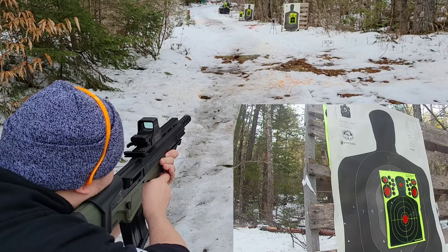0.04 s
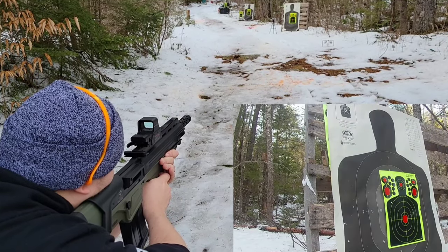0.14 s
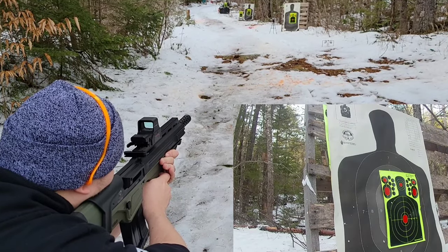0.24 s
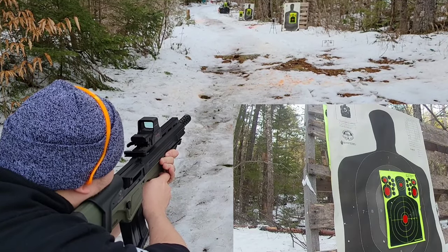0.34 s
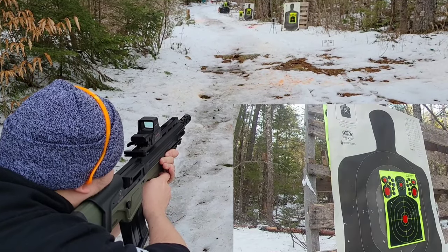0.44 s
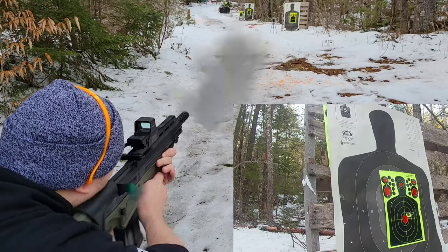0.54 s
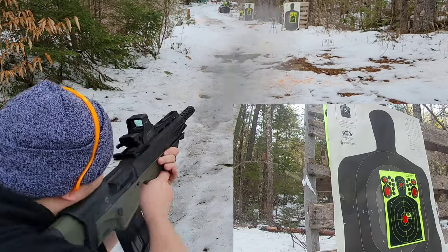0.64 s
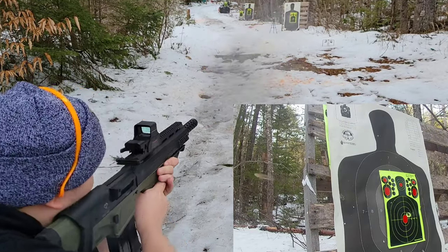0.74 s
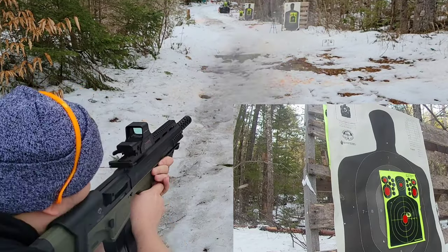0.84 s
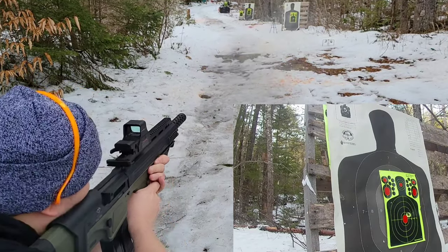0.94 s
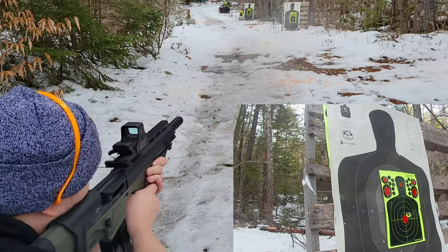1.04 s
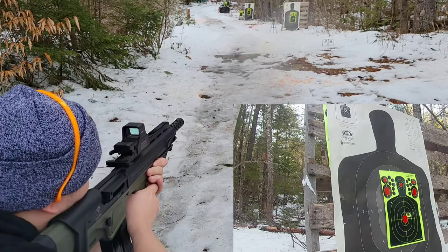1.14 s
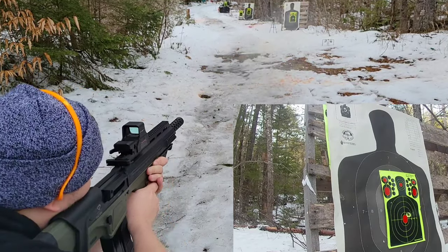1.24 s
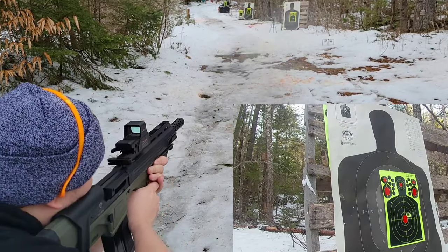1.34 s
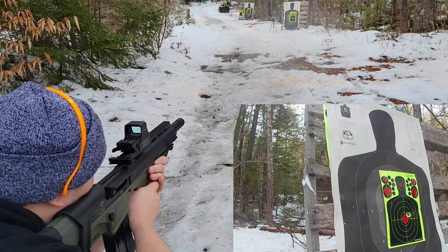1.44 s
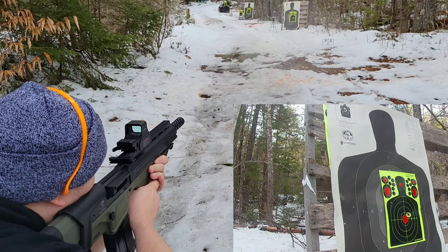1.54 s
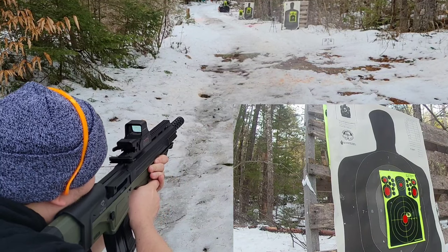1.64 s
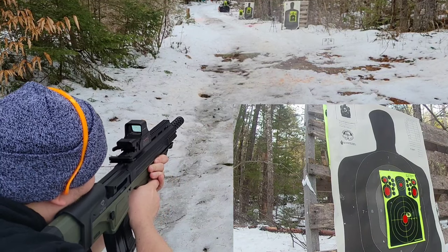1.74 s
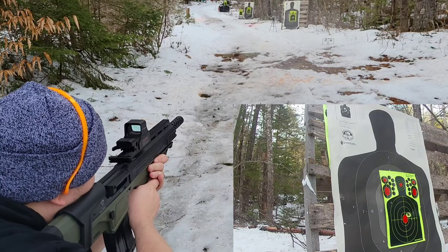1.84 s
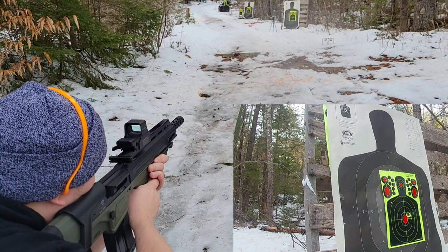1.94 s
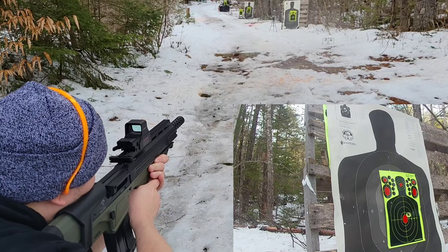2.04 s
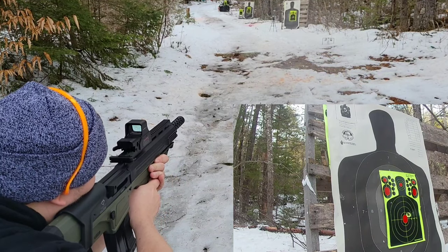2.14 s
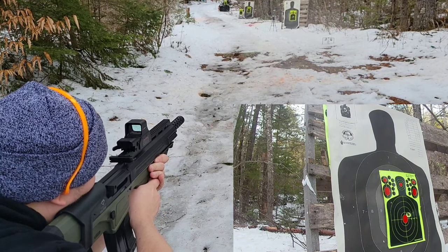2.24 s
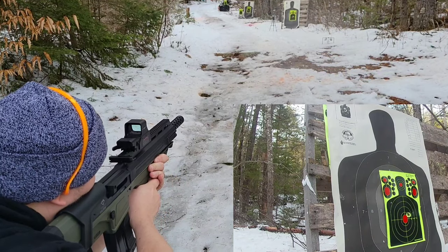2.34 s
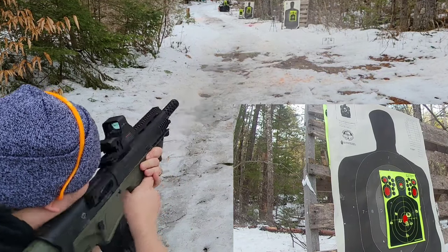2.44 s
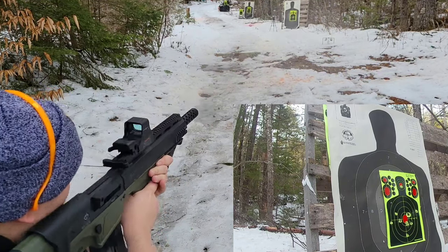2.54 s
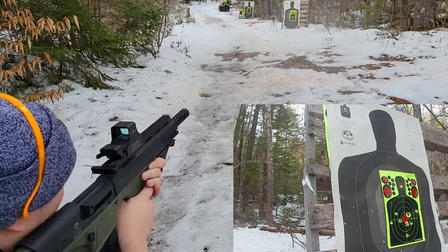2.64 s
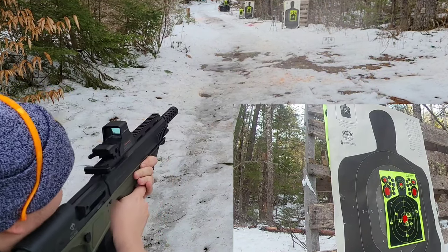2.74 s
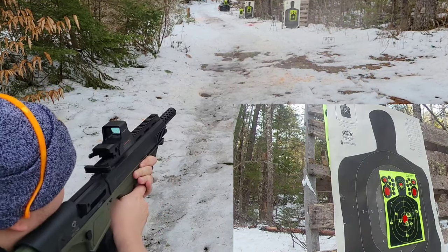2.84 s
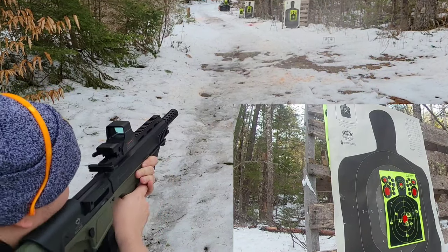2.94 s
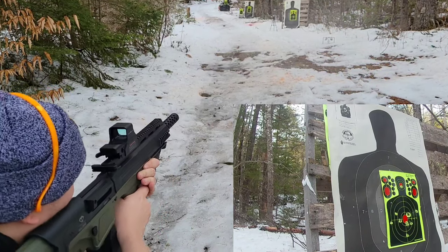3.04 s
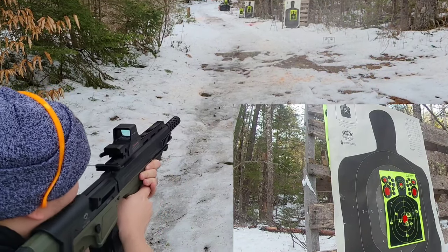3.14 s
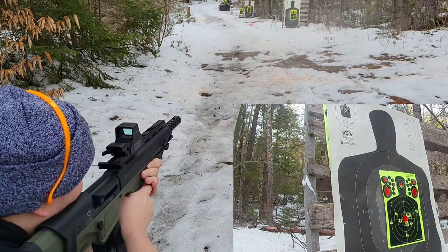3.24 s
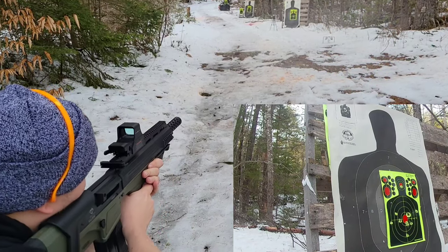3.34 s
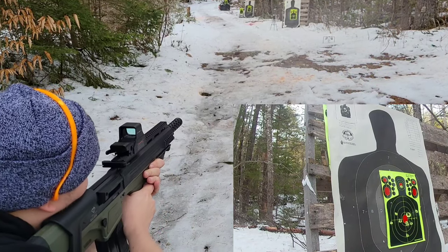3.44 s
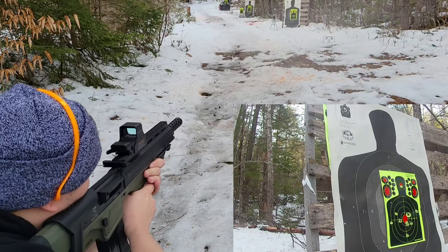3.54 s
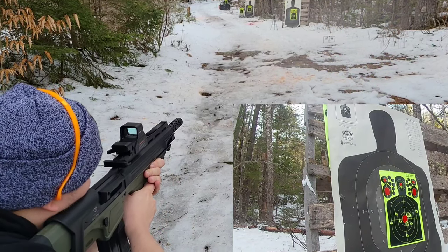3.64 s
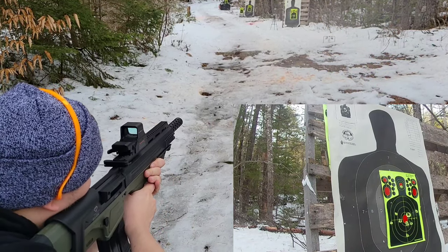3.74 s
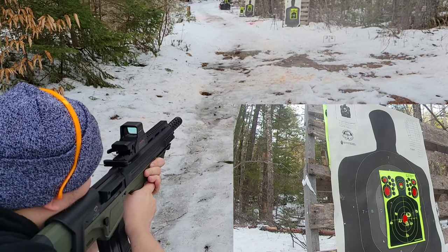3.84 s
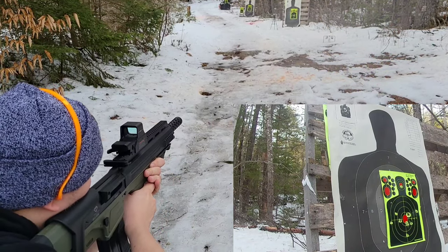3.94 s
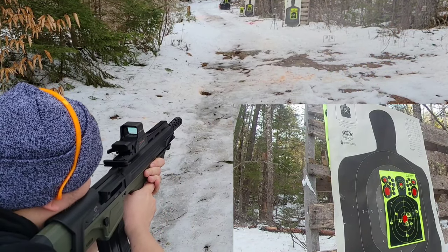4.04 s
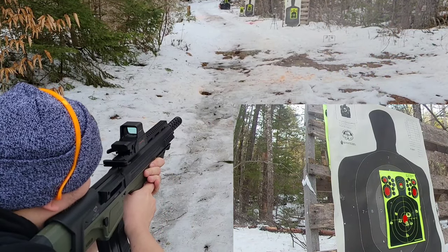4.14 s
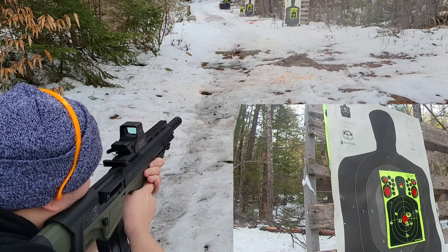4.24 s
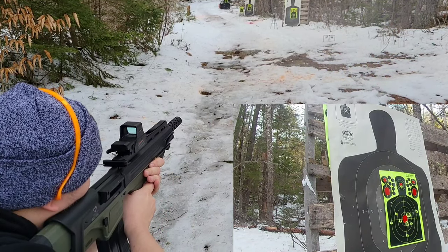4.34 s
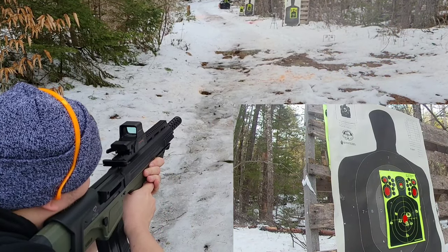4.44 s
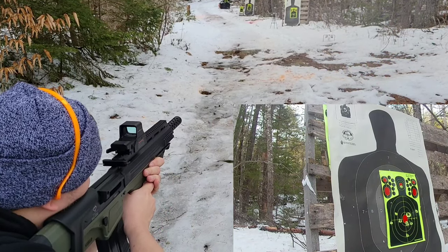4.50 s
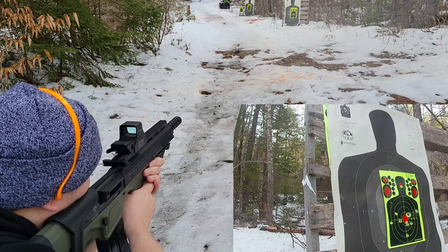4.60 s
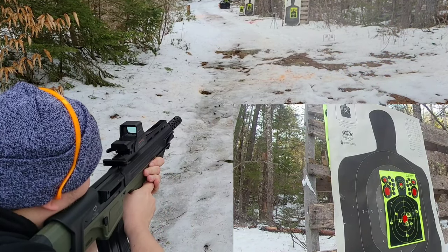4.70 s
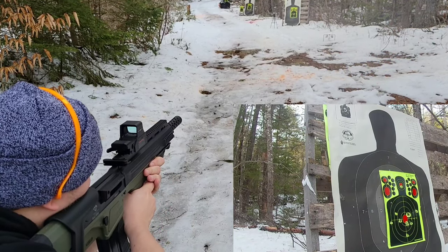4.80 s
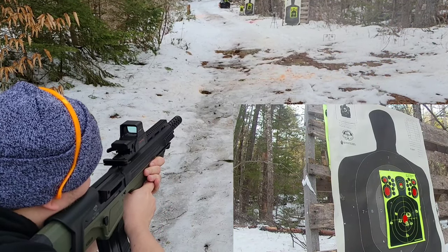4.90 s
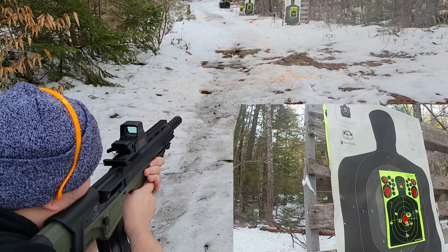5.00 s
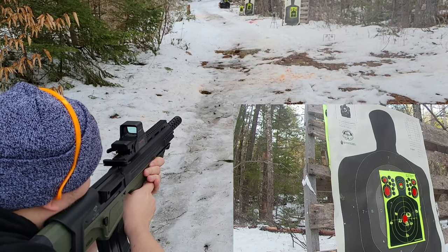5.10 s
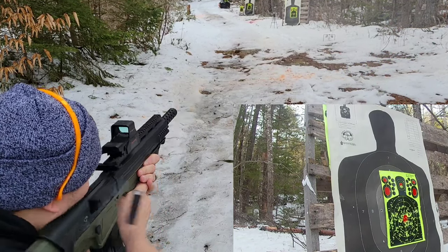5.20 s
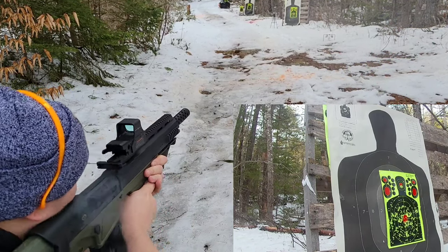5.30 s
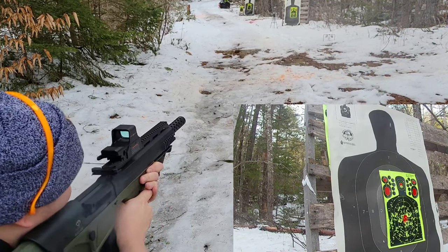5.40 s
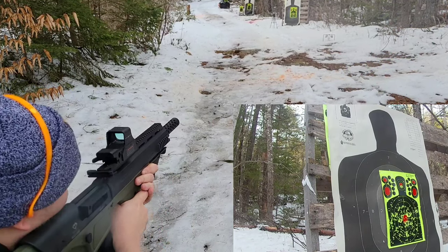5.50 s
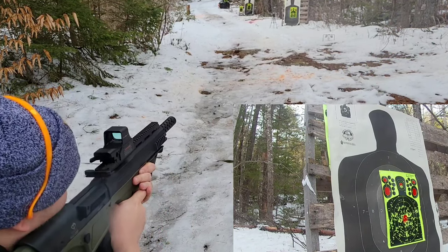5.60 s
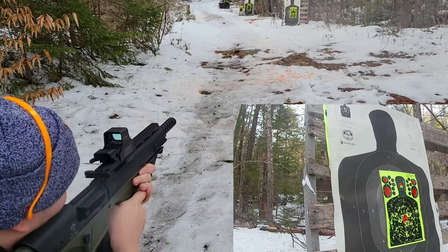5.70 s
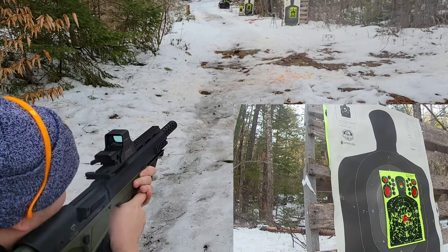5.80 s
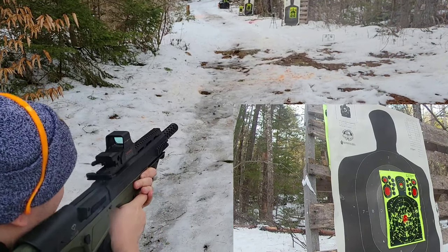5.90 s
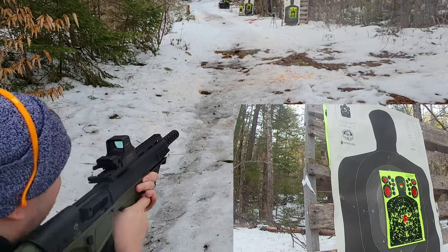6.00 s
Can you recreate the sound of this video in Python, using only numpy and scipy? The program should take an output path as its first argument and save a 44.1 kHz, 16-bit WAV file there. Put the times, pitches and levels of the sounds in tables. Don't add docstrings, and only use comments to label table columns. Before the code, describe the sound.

Very quiet winter air, with a soft distant hush in the trees. At 0.59 s, after a brief streaky hiss, a shotgun blast hits close by, clipping the small stereo microphone into a harsh, ringing crack with a wobbling low thump. Hard slaps bounce off trunks until about 0.75 s, with a bolt clack near 0.67 and a faint shell tick at 0.88. A bright near roar dies quickly, while a duller forest roar and low ground rumble roll away. A small click comes at 1.87. The second, slightly weaker blast strikes at 2.44, followed by a short clack, slap, shell tick at 2.75 and long fading tail; barely audible grip clicks come around 3.45-3.65. A metallic trigger click at 5.12 precedes the third, weakest blast at 5.24. Its echoes decay as shells bounce lightly on snow crust from 5.6 to 5.96, loudest at 5.71.

```python
import sys
import numpy as np
from scipy import signal
from scipy.fft import rfft, irfft
from scipy.io import wavfile
from scipy.ndimage import uniform_filter1d

SR = 44100
rng = np.random.default_rng(int(sys.argv[2]) if len(sys.argv) > 2 else 0)


def generate_wav(sig):
    pcm = np.round(np.clip(np.atleast_2d(sig).T, -1, 1) * 32767).astype(np.int16)
    wavfile.write(sys.argv[1], SR, pcm)


def to_linear_factor(level_db):
    exponent = np.asarray(level_db, float) / 20
    return 10 ** exponent


N = 267246

# frequency in Hz, level in dB per Hz.
AIR_COLOUR = [(15, -40.5), (30, -14.5), (70, 1), (140, -14), (300, -13.5), (600, -14.5), (1200, -24.5),
              (2100, -28), (3000, -33.5), (7000, -41.5), (9000, -44), (13000, -42), (16000, -48.5)]
AIR_DB = -64
# frequency in Hz, left-right likeness from -1 to 1.
PORT_LIKENESS = [(40, .6), (70, .45), (125, 1), (250, 0.83), (500, -.1), (1000, -0.13), (4000, -.05),
                 (12000, 0.17)]

# start in seconds, strength in dB, second ring mode in Hz, ring held in seconds,
# leading hiss in seconds.
SHOTS = [
    (.5878, 0, 2290, .0125, .038),
    (2.4370, -3.5, 2015, .0102, .044),
    (5.2385, -4.5, 2200, .006, .043),
]
# frequency in Hz, level in dB per Hz.
HISS_COLOUR = [(35, -12), (70, -1.5), (300, -8.5), (900, -8.5), (1550, -1), (2300, -9), (3300, -3.5),
               (4500, -13), (7500, -11.5), (9500, -22.5), (13000, -11), (16000, -21.5)]
HISS_DB, HISS_RISE = -12.5, 2.9
RING_HZ, THUMP_HZ = 1485, 196

# level at full strength in dB, dB it moves per dB of strength.
RING_LEVEL = (2.8, .3)
THUMP_LEVEL = (-11, -1.5)
CAPSULE_LEVEL = (3, 0.87)
NEAR_LEVEL = (-2.5, 1.01)
MIDDLE_LEVEL = (-21, 2.13)
FAR_LEVEL = (-15, 0.71)

# frequency in Hz, level in dB per Hz.
NEAR_COLOUR = [(18, -39.5), (30, -15.5), (165, -7.5), (461, -13.5), (937, -13), (1500, -11), (2410, -19.5),
               (3580, -16.5), (8740, -28.5), (13000, -28), (16000, -32.5)]
MIDDLE_COLOUR = [(300, -28.5), (1000, -8.5), (2000, 1.5), (3500, -2.5), (6000, -7.5), (8000, -12.5),
                 (10000, -27), (13000, -26.5), (16000, -33.5)]
FAR_COLOUR = [(18, -39.5), (30, -15), (76, -10.5), (138, -16.5), (223, -5.5), (330, -5.5), (480, -5.5),
              (724, -2), (1100, -5), (1500, -12.5), (2050, -12.5), (3000, -21), (6000, -23.5), (9000, -41),
              (16000, -53)]
# frequency in Hz, time to fall 60 dB in seconds.
NEAR_T60 = [(50, .9), (150, 0.7), (500, 0.4), (1500, .6), (4000, 0.38), (8000, 0.48), (14000, 0.29)]
MIDDLE_T60 = [(1000, 1.3), (3000, 1.2), (6000, 0.81), (12000, 0.77)]
FAR_T60 = [(50, 2.7), (120, 2.2), (300, 3.86), (700, 2.81), (1300, 2.34), (2100, 2.15), (3500, 1.62),
           (6000, 0.94), (9000, 1.1)]
# frequency in Hz, level in dB per Hz.
ROLL_COLOUR = [(25, -26), (45, -8.5), (76, 1), (110, -8), (160, -29.5), (16000, -88.5)]
ROLL_DB, ROLL_S = -29, 0.36

# start in seconds, push in dB, ring in dB, left-right in dB.
SLAPS = [
    (0.6062, -1.5, -15.5, 4),
    (0.621, -20, -17.5, -15),
    (0.6704, -4, -30, 11),
    (.74, -13, -15, 0),
    (2.496, -19.5, -30.5, -2.5),
    (2.509, -5.5, -14, -1.5),
    (5.2911, -15.5, -9, -0.5),
    (5.32, -23.5, -12, -3.5),
    (5.35, -20, -20, 0),
    (5.383, -12, -16.5, -3),
]
PUSH_MS, PUSH_MS_PER_DB = .62, -.022

# frequency in Hz, level in dB.
PORT_COLOUR = [(1500, 0), (6000, 2), (7700, 2.5), (9700, -6), (12000, 4.5), (14000, 4), (16000, -4)]
# level in dB, length in ms, brightness in dB per octave,
# left-right in dB.
BOLTS = [
    (-15.5, 32, -3.5, -2),
    (-15.5, 9.6, -0.5, -17),
    (-22, 4.4, 1.5, -16),
]
BOLT_AFTER_S = .0848
# start in seconds, level in dB, length in ms,
# brightness in dB per octave.
SHELLS = [
    (.88, -45, 19, -3),
    (2.7541, -43.5, 8.2, 3),
    (5.6116, -42.5, 7.5, 5),
    (5.622, -42, 6, -5),
    (5.7104, -37.5, 4.3, -8.5),
    (5.867, -43.5, 4.2, 4),
    (5.959, -50, 3.4, -2),
]
SHELL_PAN_DB = -6
# start in seconds, level in dB.
CLICKS = [
    (1.8725, -45),
    (3.45, -59),
    (3.5724, -63),
    (3.65, -64),
    (5.12, -52),
]
CLICK_MS, CLICK_TILT_DB, CLICK_PAN_DB = 3.0, -7, 2.5
# frequency in Hz, level in dB, time to fall 60 dB in seconds.
TRIGGER_MODES = [(1230, 0.5, 0.017), (2180, 1, 0.016), (2670, -1, .016), (3255, 4, 0.014), (5850, -10, .01),
                 (7730, -10, .008)]
TRIGGER_S, TRIGGER_DB = 5.1202, -34.5


def evened(x):
    return x / np.sqrt(np.mean(x ** 2) + 1e-20)


def read(points, hz):
    f, value = np.transpose(points)
    return np.interp(np.log(hz + 1), np.log(f + 1), value)


def clock(count):
    return np.arange(count) / SR


def tone(hz):
    return np.sin(2 * np.pi * np.cumsum(hz) / SR)


def drift(rows, count, size):
    return evened(uniform_filter1d(rng.standard_normal((rows, count)), size=size))


def follows(layer, strength_db):
    full_db, db_per_db = layer
    return full_db + db_per_db * strength_db


def add(mix, s, sound, pan_db=0):
    part = mix[:, round(s * SR):][:, :np.shape(sound)[-1]]
    part += (sound * to_linear_factor([[pan_db / 2], [-pan_db / 2]]))[:, :part.shape[1]]


def scatter(count, colour, t60=None, uneven_db=0., patchy_db=0., wide=8, capsule_db=0.):
    size_db = uneven_db * drift(1, count + 2048, 64)
    taps = rng.standard_normal((2, count + 2048)) * to_linear_factor(size_db)
    hz, t, (left, other) = signal.stft(taps / taps.std(), SR, nperseg=1024, noverlap=768)
    same = np.clip(read(PORT_LIKENESS, hz), -1, 1)[:, None]
    right = same * left + np.sqrt(1 - same ** 2) * other
    patches = uniform_filter1d(rng.standard_normal(left.shape), size=wide, axis=0)
    patches = evened(uniform_filter1d(patches, size=10, axis=1))
    capsule = to_linear_factor(capsule_db * np.exp(-((hz - 1350) / 450) ** 2))
    gain = evened(to_linear_factor(read(colour, hz))) * capsule
    z = np.array([left, right]) * gain[:, None] * to_linear_factor(patchy_db * patches)
    if t60:
        z *= to_linear_factor(-60 * np.maximum(t - 1024 / SR, 0) / read(t60, hz)[:, None])
    return signal.istft(z, SR, nperseg=1024, noverlap=768)[1][:, 1024:count + 1024]


def quiet_air():
    return to_linear_factor(AIR_DB) * scatter(N, AIR_COLOUR, uneven_db=1.5, patchy_db=1.04)


def leading_hiss(length_s):
    lead = np.linspace(0, np.pi / 1.75, round(length_s * SR))
    hiss = scatter(2048, HISS_COLOUR, patchy_db=4, wide=3)[:, :len(lead)]
    return to_linear_factor(HISS_DB) * hiss * np.sin(lead) ** HISS_RISE


def ring(hz, second_hz, held, fall=0.0021):
    t = clock(round(.06 * SR))
    wander, sway, upper = drift(3, len(t), 20)
    wander = wander - uniform_filter1d(wander, size=160)
    swing = -tone(hz * (1 + .21 * wander))
    swing -= .65 * np.minimum(t / .0065, 1) * tone(second_hz * (1 + .1 * sway))
    rattle = upper * np.sin(2 * np.pi * 3650 * t)
    swing += .2 * sway + .5 * rattle * np.minimum(.4 + t / .01, 1)
    return swing * np.exp(-np.maximum(t - held, 0) / fall) * np.minimum(t / 0.00034, 1)


def thump(hz, rise=.012, fall=.027):
    t = clock(round(.3 * SR))
    wander, *lurch = drift(3, len(t), 250)
    lurch = np.array(lurch)
    main = tone(hz * (1 + .09 * wander)) * to_linear_factor(1.3 * lurch) * np.exp(-(t / fall) ** 2 / 4)
    low = .7 * np.sin(2 * np.pi * 121 * t) * np.exp(-t / .05) * to_linear_factor(-2.5 * lurch)
    return (main + low) * (1 - np.exp(-(t / rise) ** 2))


def near_roar(capsule_db):
    roar = scatter(SR, NEAR_COLOUR, NEAR_T60, uneven_db=1.5, patchy_db=1.5, capsule_db=capsule_db)
    return roar * signal.windows.tukey(2 * SR, .3)[SR:]


def middle_roar():
    roar = scatter(2 * SR, MIDDLE_COLOUR, MIDDLE_T60, uneven_db=1.84, patchy_db=0.64)
    return roar * (1 - np.exp(-clock(2 * SR) / 0.097))


def far_roar(count, capsule_db):
    roar = scatter(count, FAR_COLOUR, FAR_T60, uneven_db=-0.03, patchy_db=1.15, capsule_db=capsule_db)
    return roar * (1 - np.exp(-clock(count) / 0.038))


def ground_roll():
    t = clock(SR)
    swell = np.exp(-(t / ROLL_S) ** 2) * (1 - np.exp(-t / 0.022))
    return to_linear_factor(ROLL_DB) * scatter(SR, ROLL_COLOUR) * swell


def shots():
    out = np.zeros((2, N))
    for s, strength_db, second_hz, held, hiss_s in SHOTS:
        capsule_db = follows(CAPSULE_LEVEL, strength_db)
        far_count = min(3 * SR, N - round(s * SR))
        add(out, s - hiss_s, leading_hiss(hiss_s))
        add(out, s, to_linear_factor(follows(RING_LEVEL, strength_db)) * ring(RING_HZ, second_hz, held))
        add(out, s, to_linear_factor(follows(THUMP_LEVEL, strength_db)) * thump(THUMP_HZ))
        add(out, s, to_linear_factor(follows(NEAR_LEVEL, strength_db)) * near_roar(capsule_db))
        add(out, s, to_linear_factor(follows(MIDDLE_LEVEL, strength_db)) * middle_roar())
        add(out, s, to_linear_factor(follows(FAR_LEVEL, strength_db)) * far_roar(far_count, capsule_db), -.8)
        add(out, s, ground_roll())
    return out


def slaps():
    out = np.zeros((2, N))
    for s, push_db, ring_db, pan_db in SLAPS:
        push_ms = max(PUSH_MS + PUSH_MS_PER_DB * push_db, .2)
        u = clock(2000) / (push_ms / 1000)
        add(out, s, to_linear_factor(push_db) * 1.9 * u * (2 - u) * np.exp(-u / 1.3), pan_db)
        add(out, s, to_linear_factor(ring_db) * ring(1250, 1690, .003))
    return out


def rattle_tick(db, ms, tilt_db):
    t = clock(4096)
    hz = np.fft.rfftfreq(4096, 1 / SR)
    colour_db = tilt_db * np.log2(np.maximum(hz, 1500) / 8000) + read(PORT_COLOUR, hz)
    z = rfft(rng.standard_normal((2, 4096))) * to_linear_factor(colour_db) * (hz > 1500)
    return to_linear_factor(db) * evened(irfft(z)) * np.exp(-t / (ms / 1000)) * np.minimum(t / 0.0011, 1)


def bolts():
    out = np.zeros((2, N))
    for shot, (db, ms, tilt_db, pan_db) in zip(SHOTS, BOLTS):
        add(out, shot[0] + BOLT_AFTER_S, rattle_tick(db, ms, tilt_db), pan_db)
    return out


def shells():
    out = np.zeros((2, N))
    for s, db, ms, tilt_db in SHELLS:
        add(out, s, rattle_tick(db, ms, tilt_db), SHELL_PAN_DB)
    return out


def clicks():
    out = np.zeros((2, N))
    for s, db in CLICKS:
        add(out, s, rattle_tick(db, CLICK_MS, CLICK_TILT_DB), CLICK_PAN_DB)
    return out


def trigger():
    out = np.zeros((2, N))
    t = clock(4096)
    click = np.zeros((2, 4096))
    for hz, db, t60 in TRIGGER_MODES:
        phase = rng.random((2, 1))
        click += to_linear_factor(db - 60 * t / t60) * np.sin(2 * np.pi * (hz * t + phase))
    add(out, TRIGGER_S, to_linear_factor(TRIGGER_DB) * click * np.minimum(t / 0.00088, 1) / 2, 1.5)
    return out


def scene():
    return quiet_air() + shots() + slaps() + bolts() + shells() + clicks() + trigger()


def thinned(x, under_db=-46, share=0.54, above_hz=8200):
    hz, t, z = signal.stft(x, SR, nperseg=2048, noverlap=1536)
    power = (abs(z) ** 2).mean(0)
    weak = uniform_filter1d(power, size=16, axis=0) < to_linear_factor(under_db) ** 2 * power.sum(0)
    treble = power[hz > above_hz].sum(0)
    around = np.sqrt(np.roll(treble, 6) * np.roll(treble, -6))
    weak &= treble < to_linear_factor(7) * around
    strips = rng.random((len(hz) // 7 + 1, len(t) // 4 + 1))
    strips = np.repeat(np.repeat(strips, 7, axis=0), 4, axis=1)[:len(hz), :len(t)]
    chance = share * np.clip((hz[:, None] - above_hz) / 1500 + 1, 0, 1)
    dropped = weak & (strips < chance)
    return signal.istft(z * np.where(dropped, .12, 1), SR, nperseg=2048, noverlap=1536)[1][:, :N]


def top_cut(x):
    return signal.sosfilt(signal.butter(12, 16750, fs=SR, output="sos"), x)


def record(dry):
    bass_cut = signal.butter(2, 32, "high", fs=SR, output="sos")
    heard = signal.sosfilt(bass_cut, dry)
    clipped = heard / (1 + abs(heard / 1.07) ** 4) ** (1 / 4)
    band_limit = signal.firwin(255, 15480, fs=SR)
    limited = signal.oaconvolve(clipped, band_limit[None], "same")
    mix = np.clip(thinned(limited), -1, 1)
    return top_cut(mix)


dry = scene()
out = record(dry)
generate_wav(out)
```